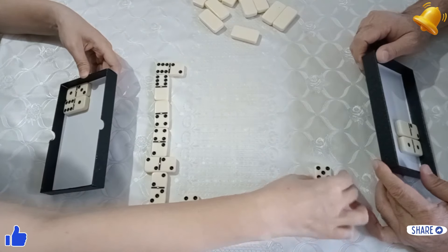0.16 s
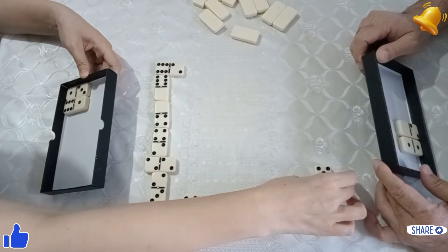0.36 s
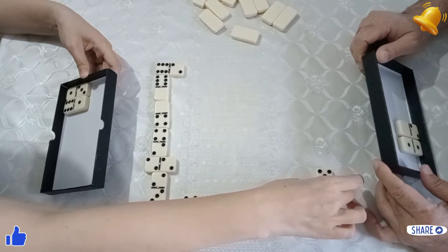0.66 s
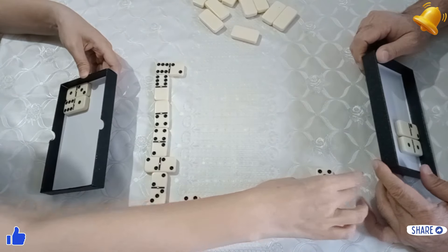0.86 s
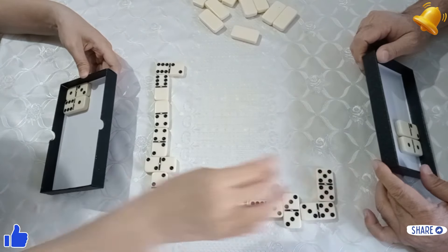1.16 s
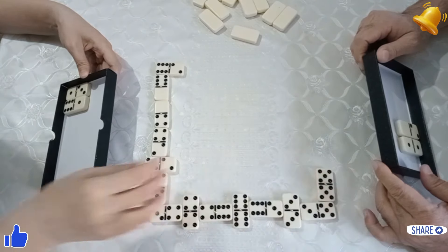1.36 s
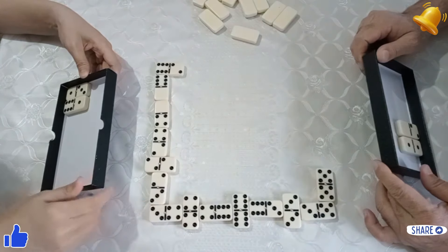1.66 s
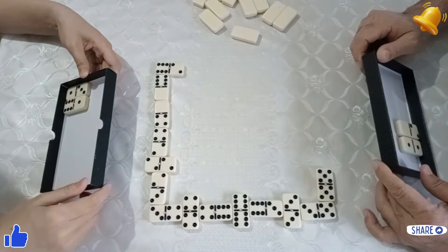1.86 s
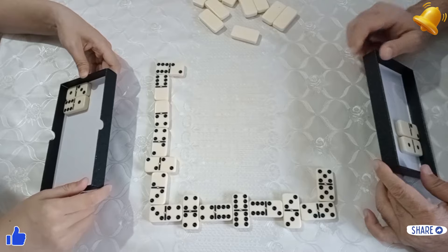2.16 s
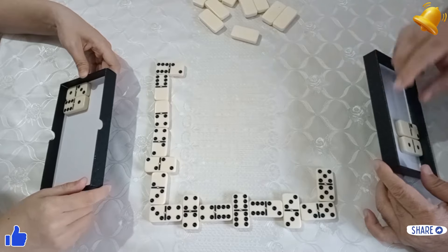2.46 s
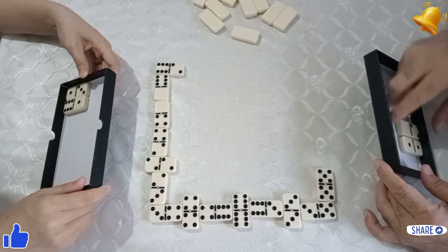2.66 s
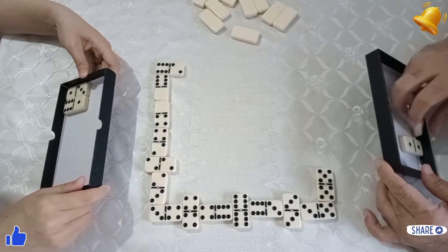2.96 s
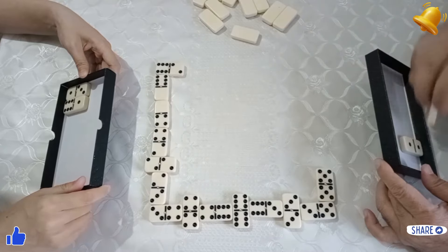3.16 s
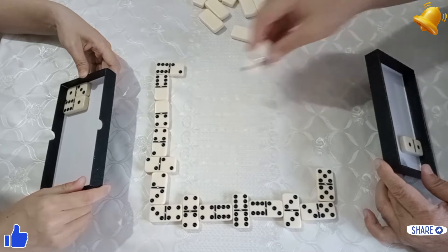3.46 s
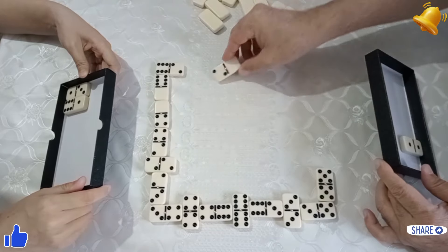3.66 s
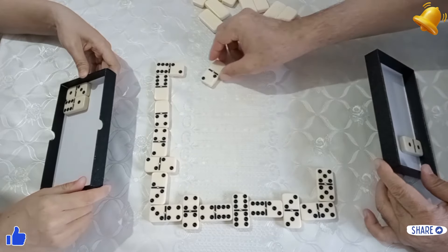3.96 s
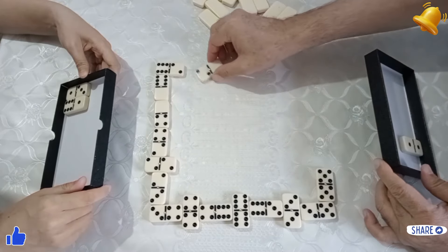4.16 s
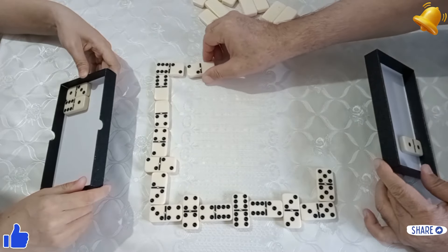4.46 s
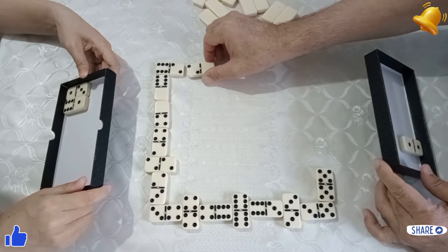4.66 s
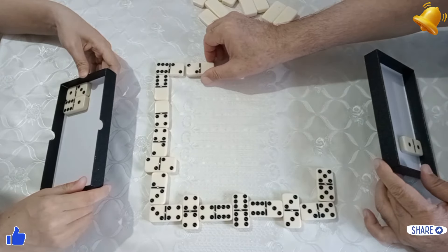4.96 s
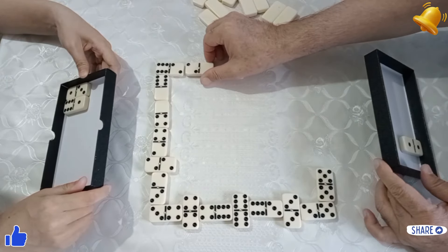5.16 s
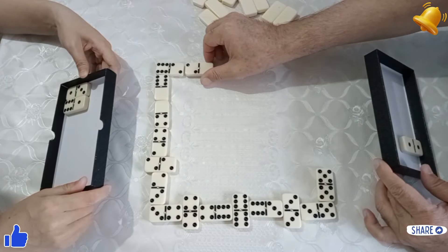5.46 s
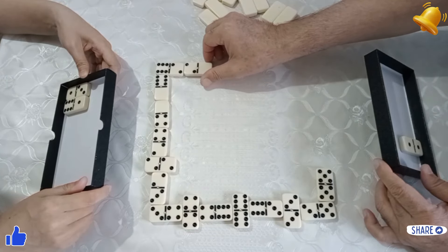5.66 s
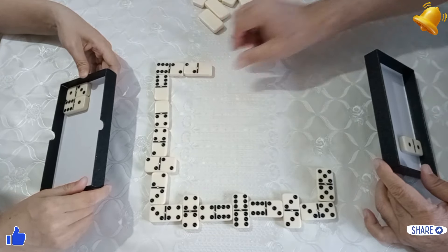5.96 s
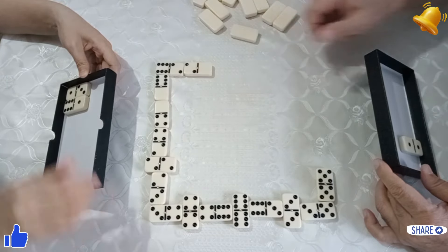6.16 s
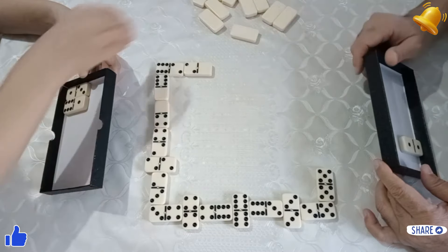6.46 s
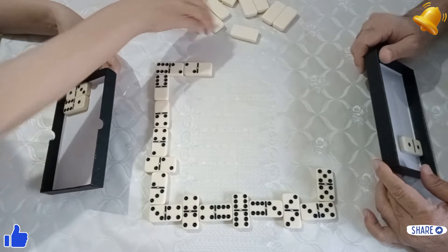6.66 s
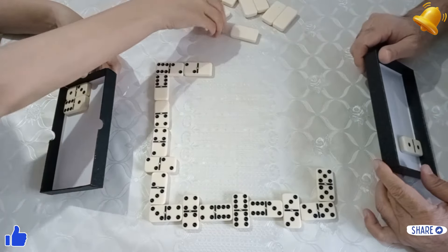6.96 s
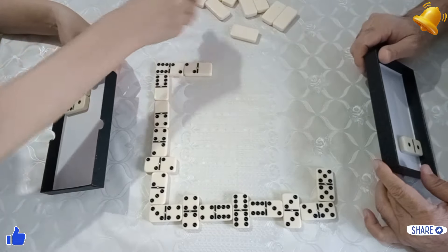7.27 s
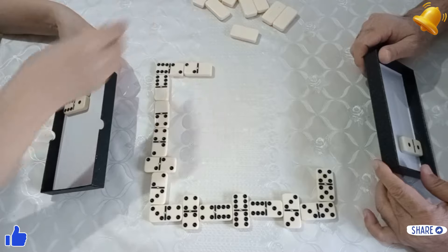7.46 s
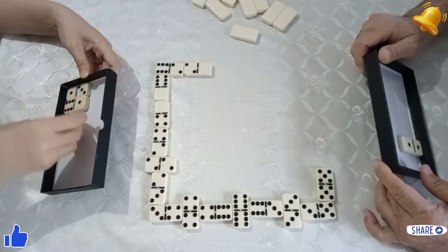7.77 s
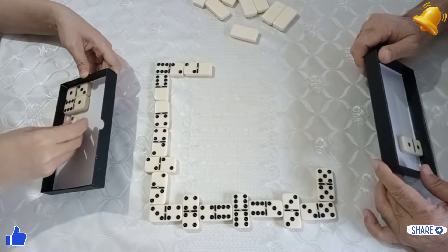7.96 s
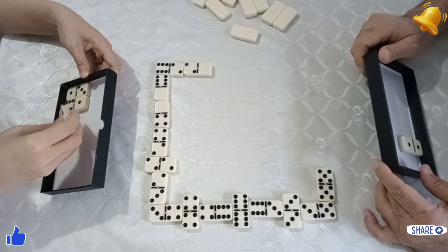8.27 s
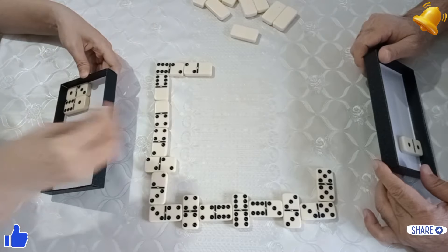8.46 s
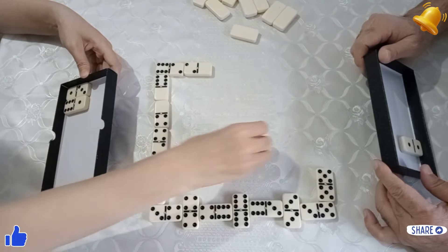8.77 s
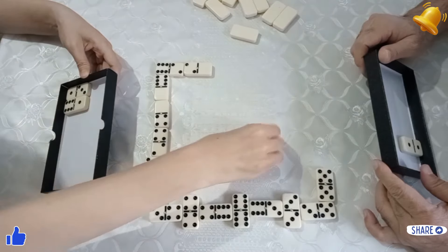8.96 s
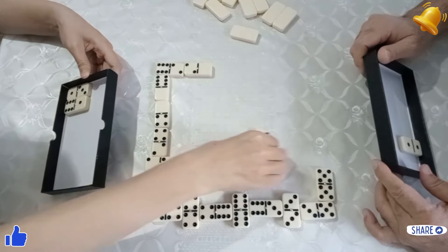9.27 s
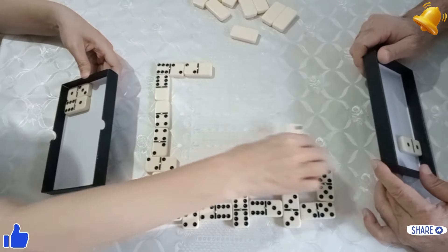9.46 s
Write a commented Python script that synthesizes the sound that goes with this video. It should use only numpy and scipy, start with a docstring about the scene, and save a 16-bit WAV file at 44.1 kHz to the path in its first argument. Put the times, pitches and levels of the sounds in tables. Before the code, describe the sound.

Domino tiles clack sharply onto a cloth-covered table in a few scattered bursts, with soft finger rubs and scrapes over a faint throbbing hum.

```python
"""Dominoes on a covered table

Tiles knock on a cloth-covered table in a bare room, clack and are pulled free: brief contacts ring resonances.
Fingers rub, tiles scrape and a forearm sweeps over the cloth: grainy or smooth noise that swells and fades.
A fingertip squeaks once on a rack: a short tone that sags in pitch. Behind it lie coloured noise for the
room air and an appliance's faint hum: steady tones, two of them so close that they throb.
"""
import sys
import numpy as np
from scipy import signal
from scipy.fft import rfft, irfft, next_fast_len
from scipy.io import wavfile
from scipy.ndimage import uniform_filter1d, minimum_filter1d, map_coordinates

SR = 44100
rng = np.random.default_rng(int(sys.argv[2]) if len(sys.argv) > 2 else 0)


def unload_wav(signal):
    """Save mono or channel-first audio to the path in sys.argv[1] as 16-bit WAV at rate SR, clipped to [-1, 1]."""
    wavfile.write(
        sys.argv[1],
        SR,
        np.round(np.clip(np.atleast_2d(signal).T, -1, 1) * 32767).astype(np.int16),
    )


N = 424241  # length of the scene [samples]
SIZE = 65536  # length of one response [samples]
HZ = np.fft.rfftfreq(SIZE, 1 / SR)
TIME = np.arange(N) / SR

# spectrum of a scuffing edge: (frequency [Hz], level [dB])
EDGE_SPECTRUM = [(1000, -13), (4000, -0.5), (6000, -4.5), (8000, -3.5), (10000, -3.5), (12000, -7.5),
                 (15000, -13.5)]
# duller spectrum of a light touch or a scrape: (frequency [Hz], level [dB])
TOUCH_SPECTRUM = [(200, -20), (800, -5.5), (1500, -7), (3000, -8.5), (4100, -4), (5500, -18.5),
                  (9000, -33.5)]
# tiles scrape along a rack or their neighbours: (time [s], level [dB], half length [s])
SCRAPE_STROKES = [(2.225, -75.5, 0.024), (2.428, -74, 0.029), (2.9, -59, 0.03), (3.031, -59, 0.012),
                  (3.268, -57.5, 0.014), (7.218, -63, 0.013), (9.286, -69, 0.012)]


def amp(db):
    """Turn decibels into a gain."""
    return 10 ** (np.asarray(db) / 20)


def unit(x):
    """Scale a sound to an rms (average strength) of 1."""
    return x / np.sqrt(np.mean(x ** 2) + 1e-20)


def along(points, hz):
    """Read a curve of (frequency, value) points at any frequency, on a log frequency axis."""
    point_hz, values = np.transpose(points)
    return np.interp(np.log(hz + 1), np.log(point_hz), values)


def wobble(rate):
    """Draw a smooth random curve through this many random points a second."""
    knots = rng.standard_normal(int(N * rate / SR) + 4)
    return map_coordinates(knots, [TIME * rate])


def filtered(x, response):
    """Multiply the spectrum of a sound by a function of frequency."""
    padded = next_fast_len(N + SR // 2)
    hz = np.fft.rfftfreq(padded, 1 / SR)
    return irfft(rfft(x, padded) * response(hz), padded)[:N]


def coloured(x, spectrum):
    """Give a sound a spectrum, at rms 1."""
    return unit(filtered(x, lambda hz: amp(along(spectrum, hz))))


def causal(gain):
    """Find the response that has this gain and sounds as early as it can (minimum phase)."""
    cepstrum = irfft(np.log(np.maximum(gain, 1e-6)))
    one_sided = np.r_[cepstrum[0], 2 * cepstrum[1:SIZE // 2]]
    return np.exp(rfft(one_sided, SIZE))


def ring(modes):
    """Let a set of resonances, (frequency [Hz], width [Hz], level [dB]), ring together; their powers add."""
    power = sum((amp(db) * HZ * width) ** 2 / ((hz * hz - HZ ** 2) ** 2 + (HZ * width) ** 2)
                for hz, width, db in modes)
    return causal(np.sqrt(power))


def resonant_boost(hz, mode):
    """Boost the sound around one resonance and leave the rest nearly as it is."""
    centre, width, db = mode
    band = 1j * hz * width / (centre * centre - hz ** 2 + 1j * hz * width)
    return 1 + (amp(db) - 1) * band


def soft(corner_hz, order):
    """A contact that lasts a while passes little above its corner frequency."""
    return causal(1 / np.sqrt(1 + (HZ / corner_hz) ** (2 * order)))


def late(seconds):
    """Response of a pure delay."""
    return np.exp(-2j * np.pi * HZ * seconds)


def scuff(length):
    """A contact scrapes for an instant: noise of energy 1 that dies away with this time constant [s]."""
    burst = rng.standard_normal(SIZE) * np.exp(-np.arange(SIZE) / SR / length)
    return rfft(burst / np.linalg.norm(burst))


def add(track, seconds, response):
    """Sound a response at the given time."""
    start = max(round(seconds * SR), 0)
    track[start:start + SIZE] += irfft(response)[:N - start]


def swells(strokes):
    """Strokes, (time [s], level [dB], half length [s]), swell and fade evenly; returns a gain."""
    return sum(amp(db) * np.exp(-.5 * ((TIME - s) / half) ** 2) for s, db, half in strokes)


def grips(strokes):
    """In a rub, (time [s], level [dB], rise [s], fade [s]), pressure builds, then the finger slides off."""
    gain = np.zeros(N)
    for s, db, rise, fade in strokes:
        log_gain = np.where(TIME < s, -.5 * ((TIME - s) / rise) ** 2, (s - TIME) / fade)
        gain += amp(db) * np.exp(log_gain)
    return gain


def room(wet_db, direct=1, build=0.0017):
    """Direct sound, near echoes and a new diffuse tail whose treble dies first and whose faint end lingers."""
    # near echoes off the walls: (delay [s], strength [gain])
    echoes = [(.0043, .3), (.0071, .15), (0.0095, .15)]
    # time the main tail takes to fall by 60 dB: (frequency [Hz], time [s])
    decay_times = [(100, .7), (300, .44), (1000, .41), (2500, .39), (4000, .34), (6000, .22), (12000, .13)]
    linger_db, linger_times = -21, 1.6  # a faint part of the tail rings this many times longer
    hz, t, noise = signal.stft(rng.standard_normal(SR), SR, nperseg=256)
    fall_db = -60 * t / along(decay_times, hz)[:, None]
    fall = amp(fall_db) + amp(linger_db + fall_db / linger_times)
    tail = signal.istft(noise * fall, SR, nperseg=256)[1]
    tail_time = np.arange(len(tail)) / SR
    tail = tail * (1 - np.exp(-(tail_time / build) ** 2))
    near = 1 + sum(strength * late(delay) for delay, strength in echoes)
    return direct * near + amp(wet_db) * rfft(tail / np.linalg.norm(tail), SIZE)


def tiles(edge_db=-33, thud_hz=420, note_width_hz=660):
    """A tile lands on one edge, then the other; it clacks and sets the table top ringing."""
    # tile blows: (time [s], table boom [dB], table thud [dB], knock [dB], knock brightness [Hz],
    # tile clack [dB], contact hardness [Hz], tile note [Hz], note level [dB], delay of second edge [s])
    blows = [(0.0117, -12.5, -4.5, 0, 2420, -8, 1950, 1506, 0, .0008),
             (0.1511, -5, -1.5, -3, 1800, -3.5, 2700, 1850, -3, .0011),
             (.1670, -5, 3, 5, 1300, 19, 5900, 3916, 26, .001),
             (2.695, -10, -6.5, -6.5, 1810, -12, 3310, 1610, -5, 0.0063),
             (2.918, -7, -5.5, -13.5, 1182, -21, 1985, 1390, -25.5, .0033),
             (3.761, 5, 5, 6, 1702, 9.5, 2400, 1820, 7.5, .0025),
             (3.9083, 9, 4.5, 7, 1300, 13.5, 3794, 1860, 11.5, .0014),
             (6.9216, 5, -2, 1, 2760, 5, 3630, 2960, 11.5, 0.0046),
             (7.213, -12.5, -9.5, -3.5, 1280, -12, 3470, 2960, -5.5, 0.00334),
             (8.9628, -9.5, -3, -5.5, 2380, -12.5, 2050, 1550, -9.5, 0.00064),
             (9.0869, -5, -3.5, -8, 1295, -19, 1490, 1280, -19.5, 0.00071),
             (9.1195, 5, 6, 9.5, 616, 9.5, 3620, 2810, 16, 0.0014)]
    # resonances of the whole table: (frequency [Hz], width [Hz], level [dB])
    table_modes = [(111.9, 5, 18), (166, 25, 12), (248, 40, 10)]
    # resonances of the table top: (frequency [Hz], width [Hz], level [dB])
    top_modes = [(320.4, 83, 2.5), (448.3, 82, -3.5), (520, 92, 5.5), (617.9, 90, 4), (794, 150, 5),
                 (1120, 520, -.5), (1600, 620, -3)]
    # resonances of a tile: (frequency [Hz], width [Hz], level [dB])
    tile_modes = [(1525, 200, -12.5), (2100, 491, -2.5), (2570, 250, 2), (3190, 650, 2.5), (3590, 580, 1)]
    # spectrum that colours the clack: (frequency [Hz], level [dB])
    clack_spectrum = [(100, -15), (900, -10.5), (1800, 4.5), (4000, -6.5), (4900, -5.5), (6300, -8.5),
                      (8000, -10), (15000, -27)]
    even_edges_db = 13  # at this note level both edges land equally hard; above it the second one leads
    firm_db = 12  # the scuff grows with the clack only up to this strength
    out = np.zeros(N)
    knock = ring(top_modes)
    clack = ring(tile_modes) * causal(amp(along(clack_spectrum, HZ)))
    edge = amp(edge_db) * causal(amp(along(EDGE_SPECTRUM, HZ)))
    for s, boom_db, thud_db, knock_db, knock_hz, clack_db, hard_hz, note_hz, note_db, gap in blows:
        second = amp(note_db - even_edges_db)
        edges = (1 + second * late(gap)) / np.hypot(1, second)
        # the cloth dulls the knock on the top; a harder contact brightens the clack
        top = amp(knock_db) * knock * soft(knock_hz, order=3)
        tile = amp(clack_db) * clack * soft(hard_hz, order=4)
        body = causal(np.hypot(abs(top), abs(tile)))
        add(out, s, body * room(wet_db=-2.0, direct=edges))
        # the whole table rings under the microphone; where the tile lands sets the lowest mode against the others
        modes = np.array(table_modes) + np.outer([boom_db, thud_db, thud_db], [0, 0, 1])
        add(out, s, ring(modes) * soft(thud_hz, order=2) * room(wet_db=-4.5))
        # the struck face sends one brief note straight up, little of it into the room; cubing narrows its band
        note = amp(note_db) * ring([(note_hz, note_width_hz, 0)]) ** 3
        add(out, s, note * room(wet_db=-11, direct=edges))
        # the edge scuffs as it touches
        scuffed = amp(min(clack_db, firm_db)) * edge * scuff(length=0.0034)
        add(out, s, scuffed * room(wet_db=-2.5))
    return out


def pulls(dull_hz=2000, slip=0.31, slip_time=.006):
    """A tile pulled free slips, then bumps its support, which answers with a hollow note."""
    # tiles bump as they are pulled free: (time [s], level [dB])
    bumps = [(2.699, 7.5), (7.211, -3)]
    # resonances of the hollow support: (frequency [Hz], width [Hz], level [dB])
    hollow_modes = [(340, 12, 8), (657, 29, 10), (798, 48, 6.5), (1170, 40, -12), (1760, 520, -22.5)]
    out = np.zeros(N)
    hollow = ring(hollow_modes) * soft(dull_hz, order=3)
    for s, db in bumps:
        slip_and_bump = slip + late(slip_time)
        add(out, s - slip_time, hollow * amp(db) * slip_and_bump * room(wet_db=-7.5))
    return out


def ticks(edge_db=1, body_db=1):
    """Nails and tile corners touch too briefly to move the table: tiny bursts of noise in two colours."""
    # light touches, before the shared trims above: (time [s], edge level [dB], body level [dB])
    touches = [(.009, -43, -25), (0.1337, -50, -24), (2.687, -34, -15), (2.981, -41, -19.5),
               (3.883, -41, -45.5), (6.180, -48, -52.5), (6.908, -43, -31.5), (6.9948, -37, -15),
               (8.957, -46, -24.5), (9.081, -36, -17.5), (9.106, -41.5, -33), (9.277, -31.5, -45),
               (9.369, -42, -50)]
    out = np.zeros(N)
    edge = causal(amp(edge_db + along(EDGE_SPECTRUM, HZ)))
    body = causal(amp(body_db + along(TOUCH_SPECTRUM, HZ)))
    for s, high_db, low_db in touches:
        touch = amp(high_db) * edge + amp(low_db) * body
        add(out, s, touch * scuff(length=0.002) * room(wet_db=0.0))
    return out


def handling(finger_db=3, grain_db=1.95):
    """Fingers and sliding tiles catch and slip in tiny grains; an arm rubs dully over the cloth."""
    # fingers rub on tiles and racks, before finger_db: (firmest grip [s], level [dB], rise [s], fade [s])
    rubs = [(1.668, -76, .018, 0.087), (1.853, -85.5, .006, .06), (2.195, -76, .018, 0.074),
            (2.41, -80, 0.05, 0.13), (3.17, -73.5, 0.18, 0.078), (3.502, -71, 0.023, 0.029),
            (3.63, -80, 0.06, .15), (4.02, -70.5, 0.15, 0.14), (4.33, -78, 0.043, 0.061),
            (4.51, -82, .02, 0.041), (6.355, -71.5, .007, 0.086), (6.75, -78.5, 0.14, 0.083),
            (7.0, -75, .03, 0.11), (7.29, -72, 0.074, 0.042), (7.425, -76.5, 0.029, 0.072),
            (8.98, -78, .02, .12), (9.25, -73.5, .07, 0.068), (9.367, -67, .007, 0.046)]
    # a forearm sweeps over the cloth: (time [s], level [dB], half length [s])
    arm_strokes = [(1.38, -66.5, .12), (3.59, -48, 0.19), (6.6, -66.5, 0.22)]
    # spectrum of rubbing fingers: (frequency [Hz], level [dB])
    finger_spectrum = [(300, -8), (1400, -6.5), (3200, 0.5), (4200, -5.5), (5400, -16), (7000, -19),
                       (10000, -15.5), (12500, -20.5), (15500, -22.5)]
    # dull spectrum of the arm on the cloth: (frequency [Hz], level [dB])
    sleeve_spectrum = [(60, -11.5), (150, 3.5), (205, -6), (275, 4.5), (370, -6), (450, -3.5), (600, -6.5),
                       (780, -11.5), (1000, -26.5), (1500, -32), (3000, -68)]
    scrape_hiss_db = 1  # trim of the scrapes' grainy hiss, before finger_db
    grains = rng.standard_normal(N) * amp(grain_db * wobble(290))
    friction = grips(rubs) + amp(scrape_hiss_db) * swells(SCRAPE_STROKES)
    fingers = amp(finger_db) * friction * coloured(grains, finger_spectrum)
    arm = swells(arm_strokes) * coloured(rng.standard_normal(N), sleeve_spectrum)
    return fingers + arm


def scrapes(body_db=-2, grain_db=2.0, wet_db=-3):
    """Each scrape swells and fades in fine grains of noise, and the scraped tile sings faintly."""
    # resonance of a scraped tile: (frequency [Hz], width [Hz], level [dB])
    tile_ring = (3200, 340, 6)
    grains = rng.standard_normal(N) * amp(grain_db * wobble(500))
    sung = filtered(grains, lambda hz: resonant_boost(hz, tile_ring))
    close = amp(body_db) * swells(SCRAPE_STROKES) * coloured(sung, TOUCH_SPECTRUM)
    return signal.fftconvolve(close, irfft(room(wet_db)))[:N]


def squeak(octave_db=-7, jitter=.08, wet_db=-3):
    """Skin sticks and slips on the rim of a rack: a short unsteady tone that sags as the finger slows."""
    # the one squeak: (time [s], level [dB], half length [s])
    stroke = (2.437, -61, .012)
    middle_hz, sag_hz_per_s = 980, 2800  # pitch before the random jitter
    steady_hz = middle_hz - sag_hz_per_s * (TIME - stroke[0])
    pitch_hz = steady_hz * (1 + jitter * wobble(300))
    phase = 2 * np.pi * np.cumsum(pitch_hz) / SR
    tone = np.sin(phase) + amp(octave_db) * np.sin(2 * phase)
    return signal.fftconvolve(swells([stroke]) * tone, irfft(room(wet_db)))[:N]


def background(air_db=-67):
    """Room air is steady coloured noise; an appliance hums in steady tones, two of them close enough to beat."""
    # spectrum of the room air: (frequency [Hz], level [dB])
    air_spectrum = [(25, -20), (42, -6), (65, 0), (110, -2.5), (190, 1.5), (280, -5.5), (600, -10),
                    (1400, -21), (2700, -16), (3900, -20), (5200, -33.5), (7500, -42), (10000, -46.5),
                    (15000, -39.5)]
    # steady tones of the hum: (frequency [Hz], rms level [dB])
    hum_tones = [(70, -82), (147.8, -69.5), (153.3, -72.5), (306.6, -84)]
    hum = np.zeros(N)
    for hz, db in hum_tones:
        hum += amp(db) * np.sqrt(2) * np.sin(2 * np.pi * (hz * TIME + rng.random()))
    air = amp(air_db) * coloured(rng.standard_normal(N), air_spectrum)
    return hum + air


def scene():
    """Add up everything at one microphone above the table."""
    handled = handling() + scrapes() + squeak()
    return (tiles() + pulls() + ticks() + handled + background())[None]


def limited(x, ceiling=.86):
    """The gain dips for a moment around a peak above the ceiling."""
    needed = np.minimum(1, ceiling / (np.abs(x) + 1e-9))
    held = minimum_filter1d(needed, size=161)
    return x * uniform_filter1d(held, size=161)


def record(dry):
    """The microphone port rings in the treble; deep bass and everything above the band limit are lost."""
    # resonance of the microphone port: (frequency [Hz], width [Hz], strength of the added ringing [dB])
    port_mode = (9700, 900, 7)
    low_hz, cut_hz = 44.32, 15600  # corner of the bass roll-off, band limit

    def microphone(hz):
        """The ringing of the port adds to the direct sound, and the bass rolls off."""
        centre, width, db = port_mode
        port = 1 + amp(db) * 1j * hz * width / (centre * centre - hz ** 2 + 1j * hz * width)
        low_cut = (1j * hz / (low_hz + 1j * hz)) ** 2
        return port * low_cut

    heard = filtered(dry[0], microphone)
    return filtered(limited(heard), lambda hz: hz < cut_hz)[None]


dry = scene()
out = record(dry)
unload_wav(out)
```